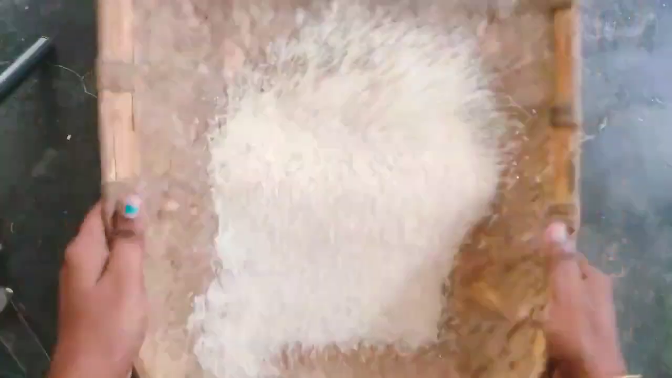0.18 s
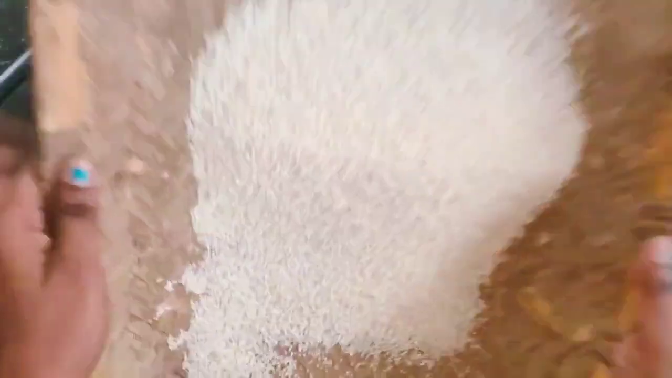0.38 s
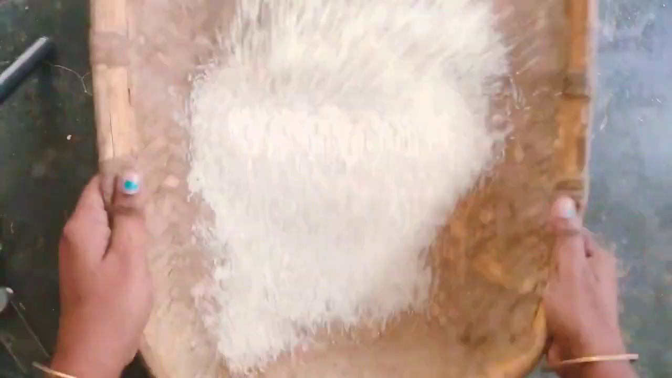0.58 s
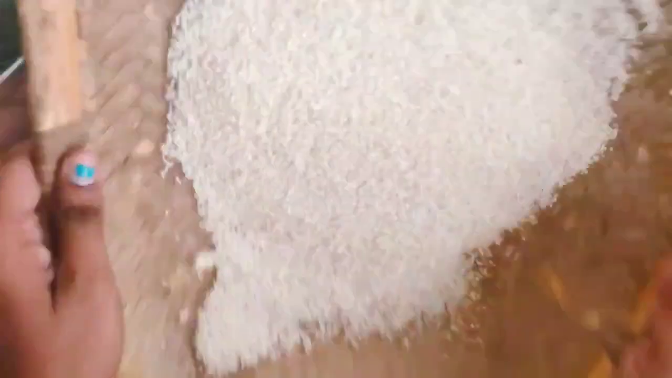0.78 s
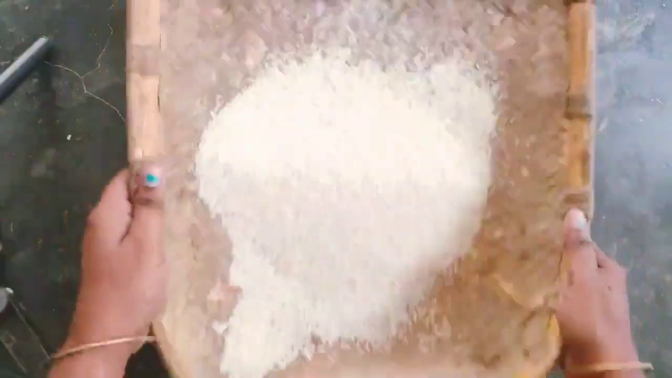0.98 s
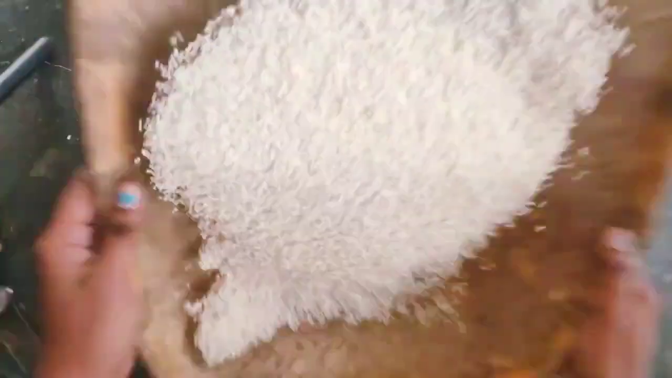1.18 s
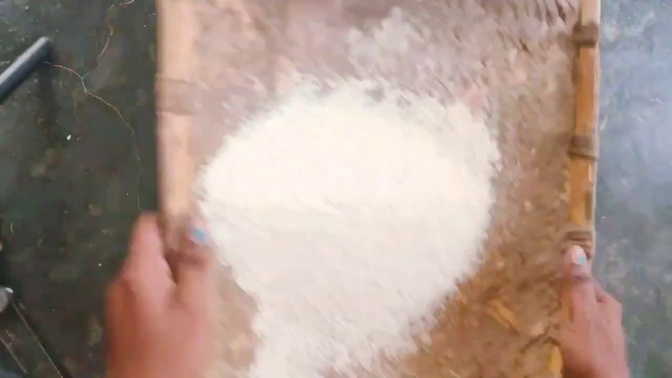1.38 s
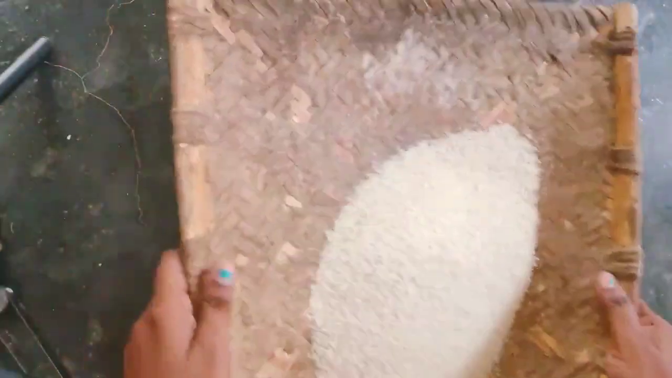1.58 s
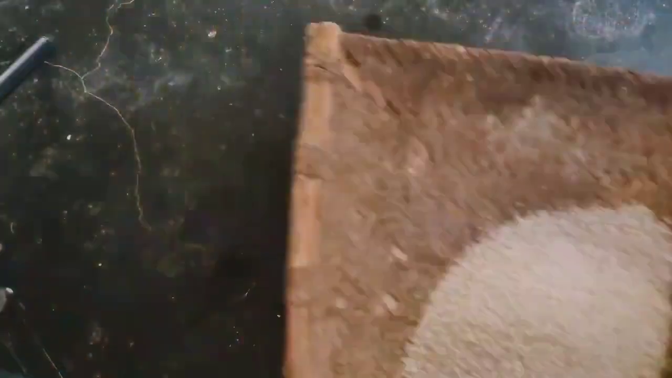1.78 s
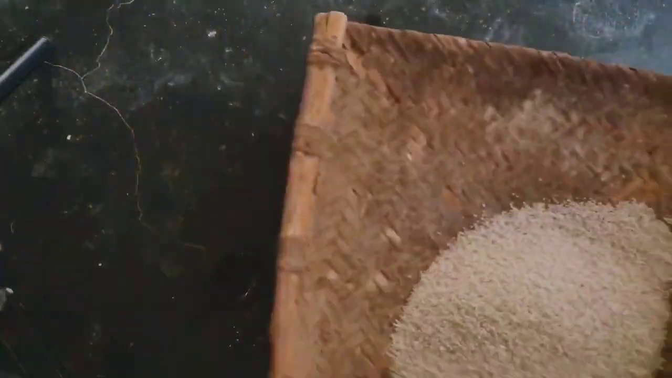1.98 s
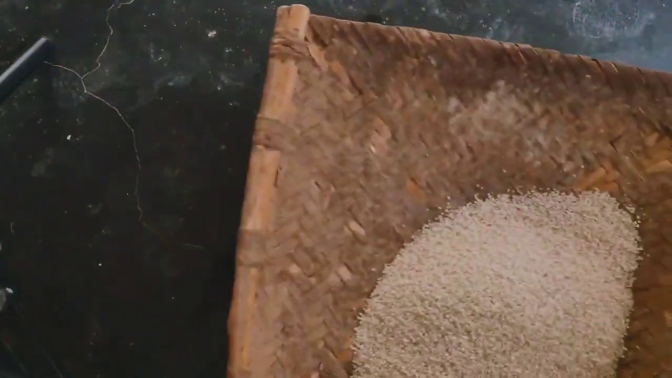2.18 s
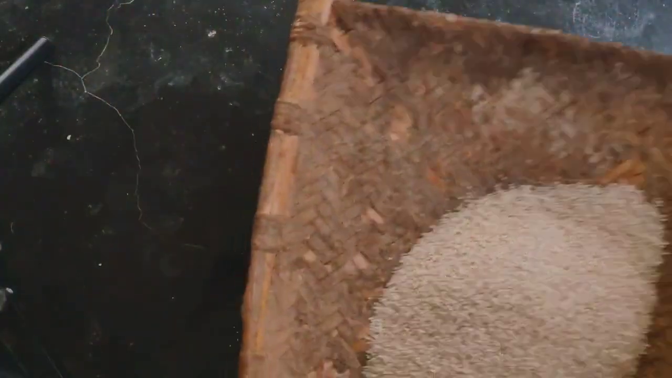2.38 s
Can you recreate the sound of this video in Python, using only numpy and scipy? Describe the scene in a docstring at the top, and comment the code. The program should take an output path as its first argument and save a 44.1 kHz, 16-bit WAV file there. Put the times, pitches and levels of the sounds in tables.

```python
"""Rice is winnowed on a woven bamboo tray in a small kitchen: four tosses, each drummed by fingers from below.
The blows are short pushes, ringing tray modes and cracking noise; the grain rains back with a swish of
random impacts that ring the weave. A last small slide settles the heap, stray grains tick and hands rub.
The tray is put down in soft bumps. Shaped noise gives the low rumble and the steady hiss behind it."""
import sys
import numpy as np
from scipy import signal
from scipy.fft import rfft, irfft
from scipy.io import wavfile
from scipy.ndimage import uniform_filter1d

SR = 44100
rng = np.random.default_rng(int(sys.argv[2]) if len(sys.argv) > 2 else 0)


def put_to_file(sound):
    """Save the sound as 16-bit audio at rate SR, in the file named by the first command-line argument."""
    columns = np.atleast_2d(sound).T  # one column per channel
    safe = np.clip(columns, -1, 1)
    whole_steps = np.round(safe * 32767)
    wavfile.write(sys.argv[1], SR, whole_steps.astype(np.int16))


N = 110250

# Spectra. Each row: frequency in Hz, relative density in dB per Hz.
# Low rumble of the background.
RUMBLE_SPECTRUM = [(15, -17), (36, 2), (55, -12.5), (90, -11), (160, -22.5), (350, -29), (700, -33),
                   (2000, -26), (6000, -64.5)]
# Steady background hiss.
HISS_SPECTRUM = [(200, -16), (500, -11), (700, -11.5), (920, -2), (1100, -4), (1400, 5), (1800, -4.5),
                 (2100, -5.5), (2450, -14), (3000, -14.5), (4000, -37), (6000, -28.5), (9000, -37),
                 (15500, -35)]
# Hands rubbing on the rim.
RUB_SPECTRUM = [(120, -28), (250, -16.5), (340, 28), (480, 1.5), (700, -13), (1200, -4), (4000, -46)]
# Heap jolted as the tray is put down.
JOLT_SPECTRUM = [(400, 3), (2500, 10.5), (4000, -3), (6000, 3), (9000, -11.5), (15500, -18)]
# Stray grain ticking on the weave.
TICK_SPECTRUM = [(1500, -20), (3500, -3), (5500, 13), (8000, -7), (15500, -12)]
# Grain landing on the tray.
GRAIN_SPECTRUM = [(180, -14), (300, -9), (348, -7), (553, -3), (652, 0.5), (923, 2), (1110, 0),
                  (1370, -0.5), (1670, -4), (2660, -1.5), (4090, -10), (5690, -2.5), (8890, -14),
                  (10100, -12), (12200, -13.5), (14800, -4.5), (15600, -3)]
# Crack of the bamboo strips.
CRACK_SPECTRUM = [(200, 0.5), (700, 7), (1400, 10.5), (2200, -2.5), (3800, -12), (5600, -7), (9000, -21),
                  (15500, -21)]
# First instant of a crack.
CLICK_SPECTRUM = [(300, 8), (900, 8), (1600, -4), (2800, -10), (4000, -12), (5600, -7), (9000, -22),
                  (15500, -40)]

# Stereo balances. Each row: frequency in Hz, left-to-right level ratio in dB.
HISS_BALANCE = [(300, 0), (950, -19), (1900, -52), (3800, -4), (7000, 4), (15000, -3)]
# Landing grain, strays and jolts. Each row: frequency in Hz, left-to-right level ratio in dB.
GRAIN_BALANCE = [(700, -0.5), (1220, 0.5), (2010, -3), (3330, 1.5), (4500, 2), (5800, 13.5), (9000, 4),
                 (12000, 6), (15000, 22)]
# Cracks and rattle. Each row: frequency in Hz, left-to-right level ratio in dB.
CRACK_BALANCE = [(700, 24), (2000, -37), (3500, 5), (5500, 21), (15000, 21)]

# Left-right likeness of grain, cracks and rubs. Each row: frequency in Hz, correlation -1 to 1.
TRAY_LIKENESS = [(300, 1), (800, 0.87), (1500, .25), (3000, 0), (15000, 0)]
# Left-right likeness of the rumble. Each row: frequency in Hz, correlation -1 to 1.
RUMBLE_LIKENESS = [(60, 1.0), (500, 0.76)]

# Rumble level, stronger while the tray moves. Each row: time in seconds, level offset in dB.
RUMBLE_OFFSETS = [(0, -0.5), (.65, 1.5), (1.4, 1), (1.75, -1.5), (2.15, -3), (2.35, 3), (2.5, 0)]
# Decay of the kitchen reflections. Each row: frequency in Hz, T60 in seconds.
ROOM_T60_S = [(100, 0.21), (400, 0.24), (1500, 0.13), (5500, 0.51), (10000, 0.31), (15000, 0.1)]
# Modes of the tray. Each row: frequency in Hz, level in dB, T60 in seconds.
TRAY_MODES = [(110.7, -21, 0.11), (201, -27.5, 0.087), (225, -13, 0.057), (300, -49, .05),
              (360.7, -18, 0.13), (456, -24, 0.22), (458.4, -28.5, 0.089), (560, -68, 0.13),
              (690, -18, 0.037), (900, -30, .04), (1160, -24, 0.022), (1296, -57, 0.018), (2112, -32, 0.12)]
# Hands rubbing on the rim. Each row: start in seconds, length in seconds, level in dB.
RIM_RUBS = [(-.05, 0.19, -71), (0.766, 0.36, -66), (1.115, 0.29, -70), (1.45, 0.44, -68), (2.171, 0.1, -61),
            (2.293, 0.098, -55.5)]
# Bumps as the tray is put down. Each row: start in seconds, thud in dB, push pitch in Hz, grain jolt in dB.
BUMPS = [(2.272, -45, 99, -69), (2.282, -46.5, 133, -72), (2.297, -43.5, 96, -54.5),
         (2.322, -38.5, 240, -56.5), (2.336, -47, 397, -70)]
# Stray grains. Each row: start in seconds, level in dB.
STRAY_GRAINS = [(0.156, -63), (.498, -63.5), (0.545, -49.5), (.862, -59), (.908, -56), (1.245, -69)]
# Grain landing on the tray. Each row: start in seconds, length in seconds, flow in dB, rise in seconds.
LANDING_FLOWS = [(-.06, 0.095, -1.5, .02), (0.265, 0.091, 2.5, 0.015), (0.629, 0.11, 1.5, 0.01),
                 (1.003, 0.11, 1.5, 0.019), (1.349, 0.1, 2, 0.019), (1.563, 0.071, -0.5, 0.041)]
# Finger blows. Each row: start in seconds, level in dB, push pitch in Hz, snap pitch in Hz,
# spot across the tray 0 to 1, then crack, snap and ring, each in dB relative to the push.
FINGER_BLOWS = [(0.223, -11.5, 560, 2060, .3, -13, -7.5, -0.5), (.2309, -11, 487, 1430, .5, -1.5, 0, 2),
                (0.2394, -22, 383, 1300, .5, -7, -6, -11), (0.5865, -15.5, 510, 746, .26, -5, -21, 6),
                (0.5954, -12.5, 486, 1250, 0.5, -4.5, -6.5, 1),
                (0.6122, -13.5, 445, 1980, 0.33, -6, -13, -5), (0.959, -31, 300, 900, .4, 0, 1.5, -11),
                (0.9654, -12, 448, 1206, 0.18, -7.5, -2, 1), (.9825, -16, 417, 1800, 0.4, -4.5, -10.5, -2),
                (1.3260, -11, 585, 856, .25, -11, -24, -7), (1.3318, -12, 480, 1140, 0.36, -6, -12.5, 1.5)]

RUMBLE_DB, HISS_DB = -53.5, -55
TRAY_ROOM_DB, GRAIN_ROOM_DB = -12, -22
CUT_HZ, LOW_CUT_HZ = 15750, 100
JOLT_T60_S, BUMP_RING_DB, STRAY_T60_S = 0.13, -2.5, 0.023

# Grain flow: the fall ends a swish, the trickle lingers, the surge peaks as the bulk of the heap lands.
FALL_DB_PER_S, TRICKLE_DB, TRICKLE_DB_PER_S = 339, -18.5, 81
FLUTTER_RMS_DB, FLUTTER_S, SURGE_DB, SURGE_S = 1.0, 0.0094, 1, 0.01
# Impact rates are per channel at unit flow; coarse and late levels are relative to the fine wash.
FINE_PER_S, COARSE_PER_S, LATE_PER_S = 9000, 220, 81
SWISH_DB, COARSE_DB, LATE_DB, LATE_LAG_S = -37, -13, -34, 0.012
GRAIN_SPREAD_DB, WEAVE_RING_DB, WEAVE_T60_S = 2, 6, 0.061
PATCHES_PER_S, PATCH_SCATTER = 22, 0.45  # travel of the landing spot, scatter in patches

PUSH_CYCLES = 0.93  # the weave bulges once and springs back
SPOT_DB = 3.5  # swing of mode level with the spot struck
PAD_HZ = 2950  # soft finger pads round off the push and snap
SNAP_T60_S = 0.0093
CRACK_DB, CRACK_T60_S, RATTLE_DB, RATTLE_T60_S, CLICK_DB = -7.5, 0.019, -15, 0.084, -5


def amp(db):
    """Converts dB to an amplitude factor."""
    return 10 ** (np.asarray(db) / 20)


def unit(x):
    """Scales to rms 1."""
    return x / np.sqrt(np.mean(x ** 2) + 1e-20)


def decay(t, t60_s):
    """Exponential decay, 60 dB down after t60_s."""
    return np.exp(-np.log(1000) * t / t60_s)


def read(points, hz):
    """Interpolates a table on a log-frequency axis."""
    f, value = np.transpose(points)
    return np.interp(np.log(hz + 1), np.log(f + 1), value)


def add(mix, start_s, sound):
    """Mixes a sound in place at start_s."""
    part = mix[..., max(round(start_s * SR), 0):][..., :sound.shape[-1]]
    part += sound[..., :part.shape[-1]]


def colour(pair, spectrum, balance=None, likeness=None):
    """Gives two unrelated signals a spectrum, balance and likeness; their centre has rms 1."""
    size = pair.shape[1]
    hz = np.fft.rfftfreq(size, 1 / SR)
    a, b = rfft(pair)
    c = np.clip(read(likeness, hz), -1, 1) if likeness else 0 * hz
    side = amp(read(balance, hz) / 2) if balance else 1 + 0 * hz
    left = a * side
    right = (c * a + np.sqrt(1 - c ** 2) * b) / side
    centre_gain = np.sqrt(side ** 2 + side ** -2 + 2 * c)
    out = irfft(np.array([left, right]) * amp(read(spectrum, hz)) / centre_gain, size)
    return out / (out.mean(0).std() + 1e-12)


def burst(spectrum, t60_s, balance, size=8192):
    """Coloured noise dying exponentially."""
    noise = colour(rng.standard_normal((2, size)), spectrum, balance, TRAY_LIKENESS)
    return noise * decay(np.arange(size) / SR, t60_s)


def blow(push_hz, ring_db, spot=0, size=8192):
    """One quick bulge of the weave plus decaying tray modes weighted by the spot struck."""
    t = np.arange(size) / SR
    push = np.sin(2 * np.pi * push_hz * t) * np.exp(-(push_hz * t / PUSH_CYCLES) ** 4)
    ring = np.zeros(size)
    for k, (hz, db, t60_s) in enumerate(TRAY_MODES):
        mode_db = db + SPOT_DB * np.cos(np.pi * k * spot)
        ring += amp(mode_db) * decay(t, t60_s) * np.sin(2 * np.pi * hz * t)
    return push + amp(ring_db) * ring


def background():
    """Low rumble near the middle and a steady hiss mostly to the right, both shaped noise."""
    rumble = colour(rng.standard_normal((2, N)), RUMBLE_SPECTRUM, likeness=RUMBLE_LIKENESS)
    rumble_db = RUMBLE_DB + np.interp(np.arange(N) / SR, *np.transpose(RUMBLE_OFFSETS))
    hiss = colour(rng.standard_normal((2, N)), HISS_SPECTRUM, HISS_BALANCE)
    return amp(rumble_db) * rumble + amp(HISS_DB) * hiss


def room(x):
    """Sparse reflections from the kitchen walls, each band dying at its own speed."""
    taps = rng.standard_normal((2, SR)) * (rng.random((2, SR)) < 0.15)
    taps[:, :SR // 200] = 0  # no reflection in the first 5 ms
    hz, t, bands = signal.stft(taps, SR, nperseg=256)
    bands = bands * decay(t, read(ROOM_T60_S, hz)[:, None])
    tail = signal.istft(bands, SR, nperseg=256)[1]
    return signal.fftconvolve(x, tail / np.linalg.norm(tail[0]), axes=1)[:, :N]


def hands():
    """Faint friction on the rim: noise with a low-mid hump near 340 Hz, swelling and fading."""
    t, swell = np.arange(N) / SR, np.zeros(N)
    for start_s, length_s, db in RIM_RUBS:
        swell += amp(db) * np.sin(np.pi * np.clip((t - start_s) / length_s, 0, 1))
    return swell * colour(rng.standard_normal((2, N)), RUB_SPECTRUM, likeness=TRAY_LIKENESS)


def put_down():
    """The rim meets the floor in a few soft bumps that ring the tray and jolt the heap."""
    out = np.zeros((2, N))
    for start_s, thud_db, push_hz, jolt_db in BUMPS:
        thud = amp(thud_db) * blow(push_hz, BUMP_RING_DB)
        jolt = amp(jolt_db) * burst(JOLT_SPECTRUM, JOLT_T60_S, GRAIN_BALANCE)
        add(out, start_s, thud + jolt)
    return out


def strays():
    """Single grains tick on the weave as short noise bursts."""
    out = np.zeros((2, N))
    for start_s, db in STRAY_GRAINS:
        add(out, start_s, amp(db) * burst(TICK_SPECTRUM, STRAY_T60_S, GRAIN_BALANCE))
    return out


def impacts(per_s, flow, patches=11):
    """Random clicks, denser and harder with the flow; each briefly rings the patch of weave it lands on."""
    hits = rng.random((2, N)) < per_s / SR * np.sqrt(flow)
    size_db = GRAIN_SPREAD_DB * np.minimum(rng.exponential(1, (2, N)), 4)
    force = hits * amp(size_db) * rng.choice([-1, 1], (2, N)) * flow ** 0.98
    # The landing spot travels round the patches.
    position = PATCHES_PER_S * np.arange(N) / SR + PATCH_SCATTER * rng.standard_normal(N)
    patch = np.floor(position) % patches
    t = np.arange(SR // 25) / SR
    clicks = force.copy()
    for k in range(patches):
        ring = rng.standard_normal((2, len(t))) * decay(t, WEAVE_T60_S)
        ring /= np.linalg.norm(ring[0])
        clicks += amp(WEAVE_RING_DB) * signal.oaconvolve(force * (patch == k), ring, axes=1)[:, :N]
    return colour(clicks, GRAIN_SPECTRUM, GRAIN_BALANCE, TRAY_LIKENESS) * np.sqrt(np.mean(flow ** 2))


def grain():
    """Dense tiny impacts: they swell, hold while the grain lands, then thin to a trickle."""
    t, flow = np.arange(N) / SR, np.zeros(N)
    for start_s, length_s, db, rise_s in LANDING_FLOWS:
        from_end_s = t - start_s - length_s
        after_s = np.maximum(from_end_s, 0)
        release = amp(-FALL_DB_PER_S * after_s) + amp(TRICKLE_DB - TRICKLE_DB_PER_S * after_s)
        surge_db = SURGE_DB * np.exp(-(from_end_s / SURGE_S) ** 2)
        flow += amp(db + surge_db) * np.clip((t - start_s) / rise_s, 0, 1) * release
    flutter = unit(uniform_filter1d(rng.standard_normal(N), int(FLUTTER_S * SR)))
    flow *= amp(FLUTTER_RMS_DB * flutter)
    # Late grains bounce on after the heap has landed.
    late_flow = np.sqrt(np.interp(t - LATE_LAG_S, t, flow))
    fine = impacts(FINE_PER_S, flow)
    coarse = amp(COARSE_DB) * impacts(COARSE_PER_S, flow ** 0.56, patches=4)
    late = amp(LATE_DB) * impacts(LATE_PER_S, late_flow, patches=3)
    return amp(SWISH_DB) * (fine + coarse + late)


def click(size=256):
    """One sharp spike with a shaped spectrum, peak 1, faded at its end."""
    spike = irfft(amp(read(CLICK_SPECTRUM, np.fft.rfftfreq(size, 1 / SR))), size)
    spike = np.roll(spike, size // 16)
    fade = np.minimum(1, 4 * (1 - np.arange(size) / size) ** 2)
    return spike / spike.max() * fade


def fingers():
    """Two or three fingers hit the tray milliseconds apart; the strips snap, crack and rattle."""
    out, t = np.zeros((2, N)), np.arange(8192) / SR
    pad = signal.butter(2, PAD_HZ, fs=SR, output="sos")
    for start_s, db, push_hz, snap_hz, spot, crack_db, snap_db, ring_db in FINGER_BLOWS:
        # Two-row factors are left and right.
        snap = np.sin(2 * np.pi * snap_hz * t) * decay(t, SNAP_T60_S) * amp([[-3.5], [2.5]])
        crack = amp(CRACK_DB) * burst(CRACK_SPECTRUM, CRACK_T60_S, CRACK_BALANCE)
        crack += amp(RATTLE_DB) * burst(CRACK_SPECTRUM, RATTLE_T60_S, CRACK_BALANCE)
        add(crack, 0, amp(CLICK_DB) * click() * amp([[-2], [2]]))
        body = blow(push_hz, ring_db, spot) * amp([[-1.1], [0.9]]) + amp(snap_db) * snap
        body = signal.sosfilt(pad, body)
        add(out, start_s, amp(db) * (body + amp(crack_db) * crack))
    return signal.sosfilt(signal.butter(2, LOW_CUT_HZ, "high", fs=SR, output="sos"), out)


def scene():
    """Sums tray, rice, their reflections and the background."""
    tray = fingers() + hands() + put_down()
    rice = grain() + strays()
    reflections = room(amp(TRAY_ROOM_DB) * tray + amp(GRAIN_ROOM_DB) * rice)
    return tray + rice + reflections + background()


def record(dry):
    """Band limit of the recorder: a steep linear-phase low-pass."""
    low_pass = signal.firwin(1023, CUT_HZ, window=("kaiser", 9), fs=SR)
    return signal.oaconvolve(dry, low_pass[None], "same")


dry = scene()
out = record(dry)
put_to_file(out)
```